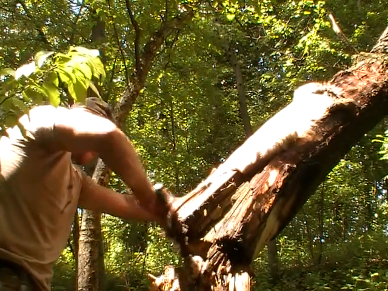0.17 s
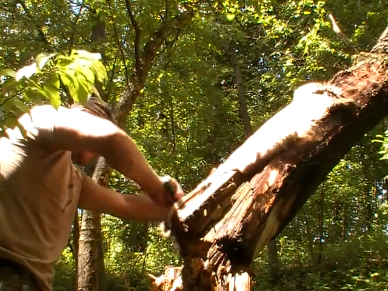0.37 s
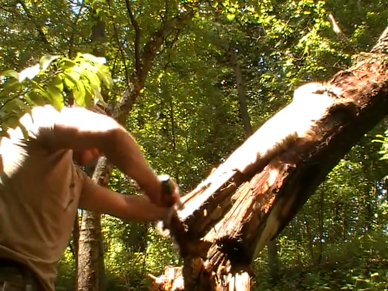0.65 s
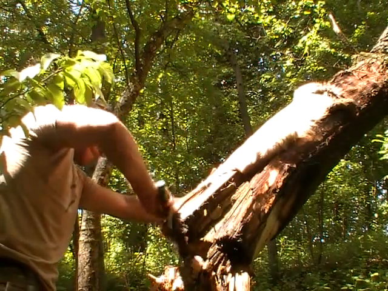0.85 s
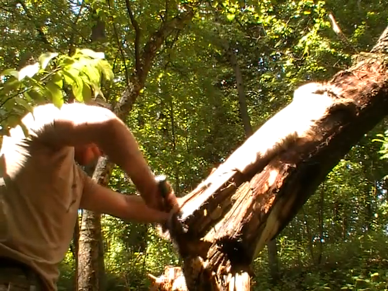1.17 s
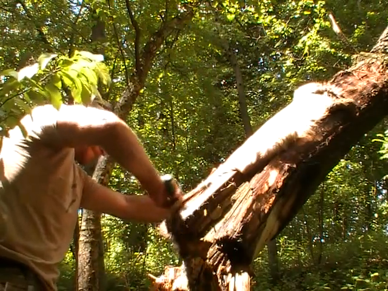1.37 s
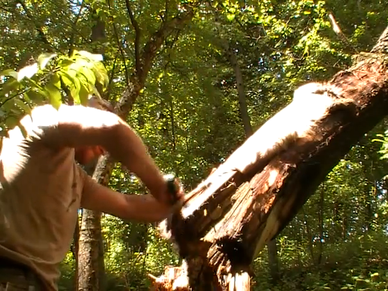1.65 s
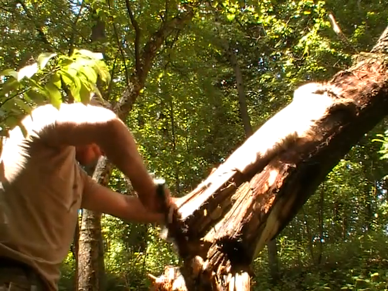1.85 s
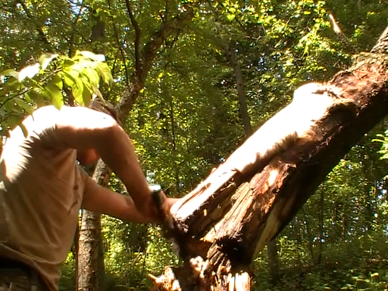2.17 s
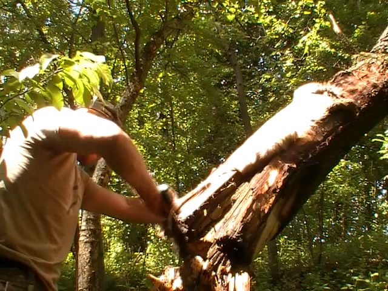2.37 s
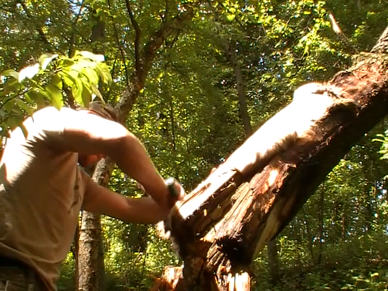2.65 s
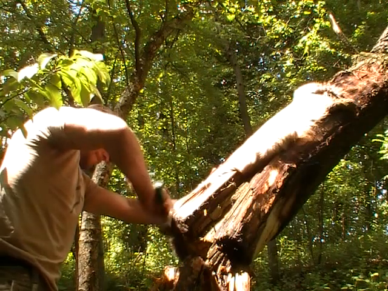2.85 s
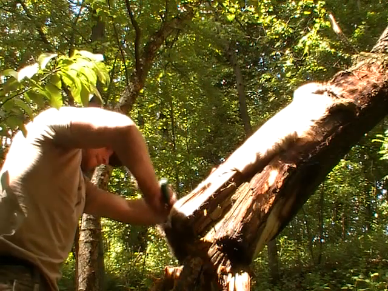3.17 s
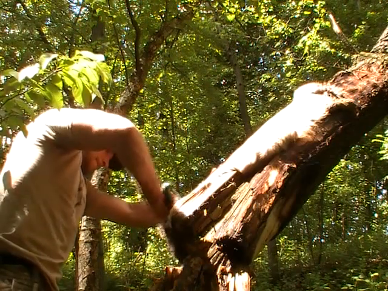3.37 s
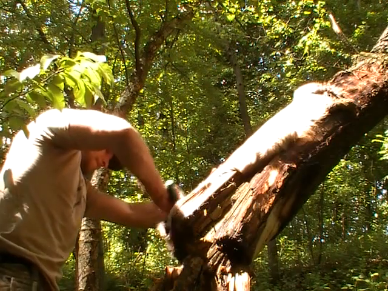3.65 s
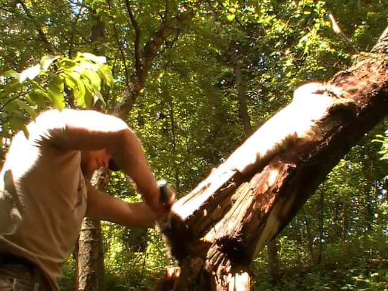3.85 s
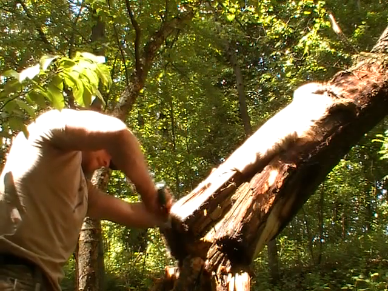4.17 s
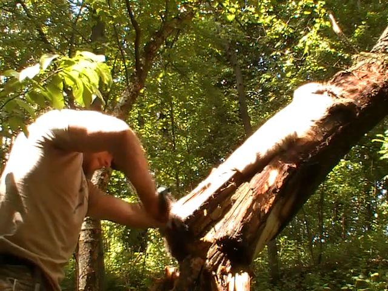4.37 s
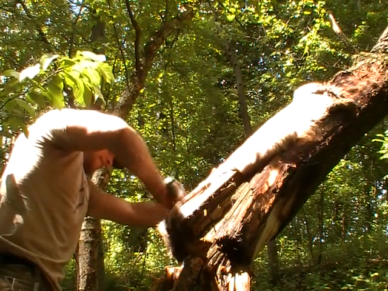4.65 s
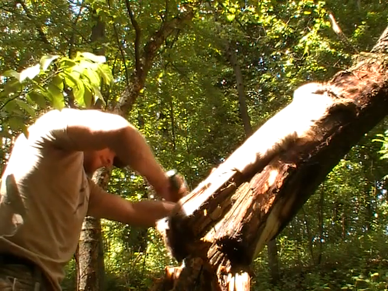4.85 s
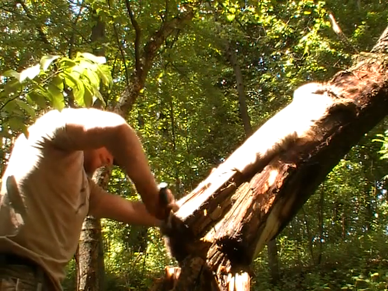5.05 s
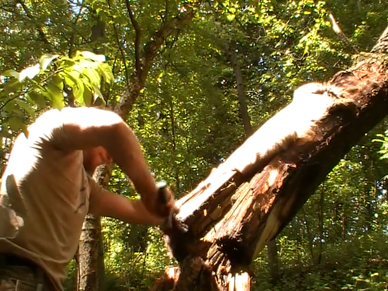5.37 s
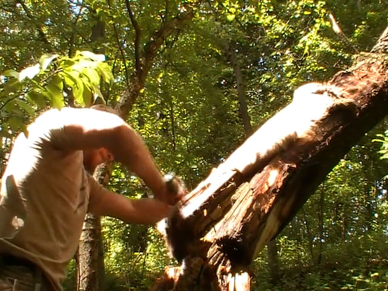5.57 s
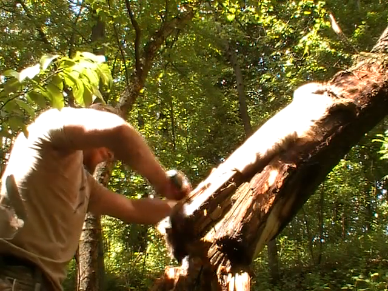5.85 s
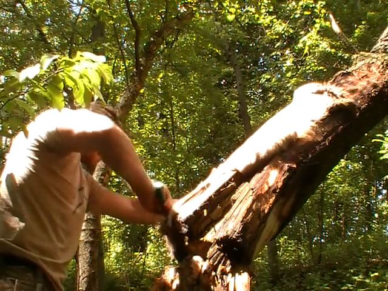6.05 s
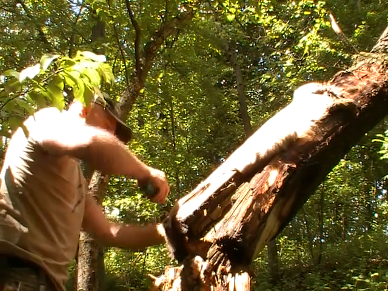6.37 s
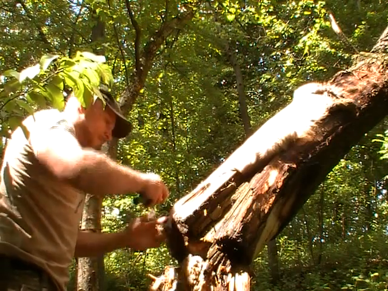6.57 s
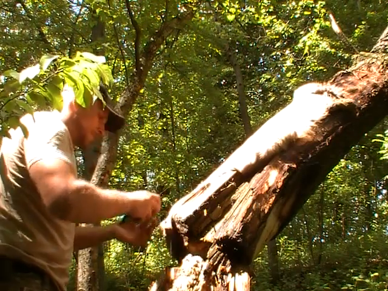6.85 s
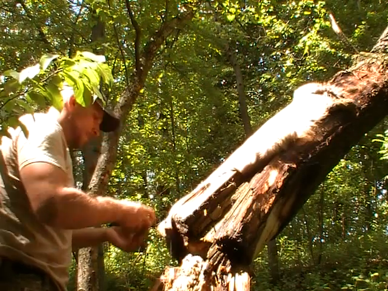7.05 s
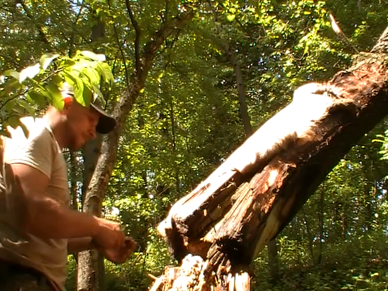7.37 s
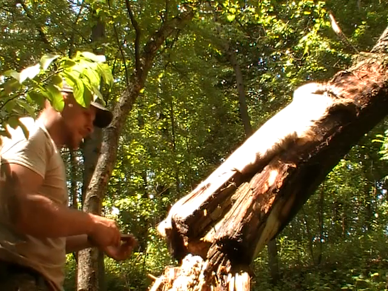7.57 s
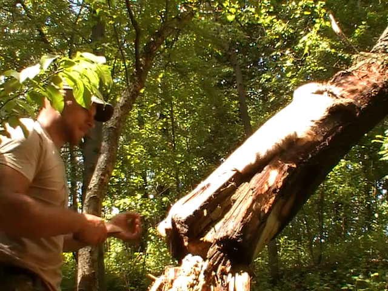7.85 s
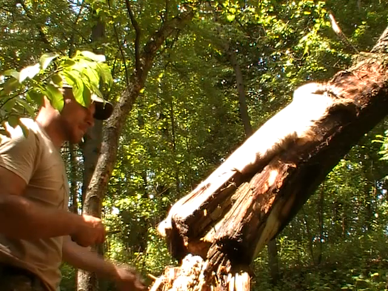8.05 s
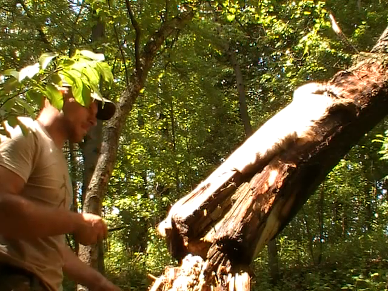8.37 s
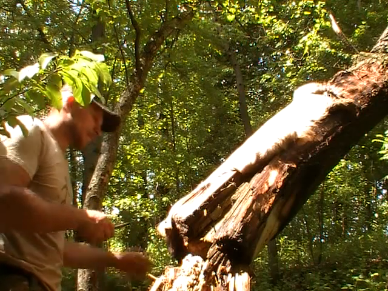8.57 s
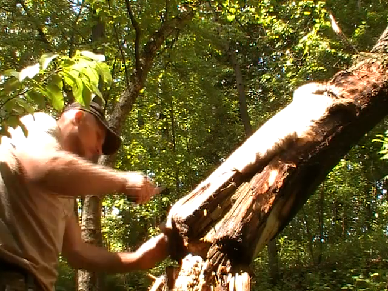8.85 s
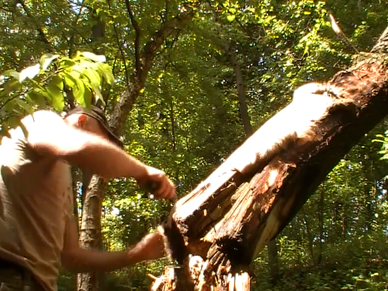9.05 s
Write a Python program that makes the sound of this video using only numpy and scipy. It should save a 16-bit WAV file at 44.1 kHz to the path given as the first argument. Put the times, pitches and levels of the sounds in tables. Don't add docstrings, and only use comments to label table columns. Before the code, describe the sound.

An outdoor wood with a quiet, steady hiss of leaves and distant traffic. From 0 to about 5.9 seconds a knife scrapes wet hide on a log some metres away: nineteen short strokes, roughly one every 0.3 seconds, each with a bright edge hiss, damp rasp and hollow wooden boom, slightly uneven in strength. A young bird gives thin, nasal, hoarse peeps throughout, mostly in pairs, weaker and more scattered from 3.5 to 6 seconds. Its mother yelps sharply with woodland echo near 0.9, 2.8 and 4.3 seconds, faintly at 5.5, with soft low hoots between and later. At 3.5 seconds a fly buzzes abruptly close and bumps the microphone with a hard double tick, gone by 3.6. After 6.1 seconds fingers rub sticky scraps, crackling softly, strongest around 7.2 to 7.4 with a crisp snap, then small snaps until the end at about 9.2.

```python
import sys
import numpy as np
from scipy import signal
from scipy.fft import rfft, irfft, next_fast_len
from scipy.io import wavfile
from scipy.ndimage import uniform_filter1d

SR = 44100
rng = np.random.default_rng(int(sys.argv[2]) if len(sys.argv) > 2 else 0)


def file_out(sig):
    cols = np.atleast_2d(sig).T
    lim = np.clip(cols, -1, 1)
    pcm = np.round(lim * 32767).astype(np.int16)
    wavfile.write(sys.argv[1], SR, pcm)


def gain_from_db(level_db):
    decades = np.asarray(level_db, float) / 20
    return 10 ** decades


N = 405719
TIME = np.arange(N) / SR
TREMBLE = uniform_filter1d(rng.standard_normal(N), 60) * np.sqrt(60)

# (edge bites [s], bite to hiss peak [s], edge hiss [dB], wet rasp [dB], log boom [dB])
KNIFE_STROKES = [(.092, .054, -51, -52.5, -50), (.405, .018, -51, -54.5, -53),
                 (.722, 0.054, -52.5, -54.5, -51), (1.018, .005, -52, -55.5, -50),
                 (1.335, .01, -52, -62, -52), (1.636, 0.058, -46.5, -61, -51),
                 (1.985, 0.059, -51, -55.5, -56.5), (2.342, .048, -52.5, -62, -56.5),
                 (2.662, .04, -46.5, -53, -50), (2.974, .005, -53, -56, -50.5),
                 (3.315, .02, -47, -56, -46.5), (3.632, .015, -47.5, -54.5, -48),
                 (3.958, 0.059, -46, -53.5, -47.5), (4.28, .064, -45.5, -53, -45.5),
                 (4.592, .06, -54, -56, -46.5), (4.908, .066, -51, -51.5, -47.5),
                 (5.208, 0.073, -51, -53.5, -51), (5.515, .006, -50.5, -54.5, -49.5),
                 (5.82, .085, -52, -51, -46)]
SLIDE_S = 0.09


def unit(x):
    return x / np.sqrt(np.mean(x ** 2))


def shaped(x, gain):
    size = next_fast_len(N)
    hz = np.arange(size // 2 + 1) * SR / size + 1
    return irfft(rfft(x, size) * gain(hz), size)[:N]


def ring(x, modes):
    def response(f):
        return sum(gain_from_db(db) / (1 + 1j * (f / hz - hz / f) * hz / width) for hz, width, db in modes)
    return unit(shaped(x, response))


def walk(rate_hz):
    hold = int(SR / rate_hz)
    steps = np.repeat(rng.standard_normal(N // hold + 1), hold)
    return unit(uniform_filter1d(uniform_filter1d(steps, hold), hold)[:N])


def grit(spread_db, flutter_db):
    size_db = spread_db * np.minimum(rng.exponential(size=N), 6)
    slips = rng.standard_normal(N) * gain_from_db(size_db)
    return slips * gain_from_db(flutter_db * walk(160))


def add(out, start, wave):
    wave = wave[max(-start, 0):N - start]
    start = max(start, 0)
    out[start:start + len(wave)] += wave


def wood(x, tail_db, echo_db):
    # (delay [s], level [dB])
    trunk_echoes = [(.006, -4), (.013, -5), (.022, -6), (.031, -8), (.052, -9), (.078, -12)]
    t60_s, onset_s = 0.43, 0.0052
    t = TIME[:int(SR * .7)]
    tail = rng.standard_normal(len(t)) * np.exp(-np.log(1000) * t / t60_s) * np.minimum(t / onset_s, 1)
    answer = tail * gain_from_db(tail_db) / np.sqrt(np.sum(tail ** 2))
    for delay_s, db in trunk_echoes:
        answer[int(delay_s * SR)] += gain_from_db(db + echo_db)
    return x + signal.fftconvolve(x, answer)[:N]


def stroke_level(peak_s, peak_db, bite_db, end_db):
    dig_s, lift_s = 0.041, 0.02
    touch_db, lifted_db = -21, -25
    bite = np.transpose(KNIFE_STROKES)[0][:, None]
    zero = 0 * peak_s
    end = zero + SLIDE_S
    s = bite + np.c_[zero - dig_s - .01, zero - dig_s, zero, peak_s, end, end + lift_s, end + lift_s + .01]
    shape_db = np.array([-50, touch_db + bite_db, bite_db, 0, end_db, lifted_db, -50])
    db = peak_db[:, None] + shape_db
    return gain_from_db(np.interp(TIME, s.ravel(), db.ravel()))


def knife():
    # (centre [Hz], width [Hz], level [dB])
    log_modes = [(1027, 270, 2), (1616, 540, -3), (2104, 380, -10)]
    edge_modes = [(6960, 2200, 2.5), (8500, 8200, 23.5), (12500, 4000, -13.5)]
    log_lead_s = 0.01
    _, peak_s, edge_db, rasp_db, log_db = np.transpose(KNIFE_STROKES)
    peak_s = np.clip(peak_s, .001, SLIDE_S - .005)
    halfway_s = np.full(len(KNIFE_STROKES), SLIDE_S / 2)

    def sagging(db, halfway_db, end_db):
        return stroke_level(halfway_s, db + halfway_db, -halfway_db, end_db - halfway_db)

    slips = grit(1.8, 2.25)
    hiss = ring(slips, edge_modes) * stroke_level(peak_s, edge_db, -4, -13)
    rasp = ring(slips + grit(1.7, 2.4), [(3200, 4400, 0)]) * sagging(rasp_db, -3, -12.5)
    boom = ring(ring(grit(2.6, 2.4), log_modes), [(1250, 1600, 0)])
    boom = boom * np.roll(sagging(log_db, -4.5, -13), -int(log_lead_s * SR))
    sound = hiss + gain_from_db(3.5) * rasp + gain_from_db(0.4) * boom
    return wood(sound * gain_from_db(1.16), -20.0, -23)


def hands():
    # (start [s], hold [s], level [dB])
    rubs = [
        (6.13, .15, -62),
        (6.38, 0.15, -54),
        (7.244, .12, -48),
        (7.85, .3, -64),
        (8.37, .17, -60.5),
        (8.6, .19, -56.5),
        (9.03, .01, -54),
        (9.19, .02, -54),
    ]
    # (time [s], peak [dB], mid share [dB], decay [s])
    snaps = [(.147, -36, -8, .002), (1.006, -35, -10, .001), (1.0145, -37, -9, .0007),
             (1.442, -36, -19, .0015), (1.695, -33, -18, .001), (1.7796, -37, -16, .001),
             (2.0424, -41, 2, .0015), (2.7144, -39, -6, .001), (2.9735, -39, -7, .001),
             (6.4377, -41, -15, .001), (6.54, -36, -20, .001), (6.6367, -40, -14, .001),
             (7.211, -38, -16, .0015), (7.2589, -36, -17, .0006), (7.3104, -34, -17, .0006),
             (7.3366, -21, -18, .0005), (7.3454, -35, -22, .001), (7.3564, -35, -20, .0007),
             (7.9422, -29, -17, .0025), (8.173, -31, -17, .0025), (8.374, -41, -14, .001),
             (8.717, -41, -20, .001), (8.752, -42, -20, .001), (8.945, -41, -20, .001),
             (8.4591, -43, -14, .001), (8.5893, -37, -10, .0007), (8.6945, -39, -14, .001),
             (8.7689, -43, -10, .001), (9.1645, -37, -2, .002)]
    rise_db_per_s, fall_db_per_s = 200, 200
    fiddle_db, fiddle_from_s = -71, 6.8

    levels_db = []
    for start_s, hold_s, db in rubs:
        before_s = np.maximum(start_s - TIME, 0)
        after_s = np.maximum(TIME - start_s - hold_s, 0)
        levels_db.append(db - rise_db_per_s * before_s - fall_db_per_s * after_s)
    floor_db = np.where(TIME > fiddle_from_s, fiddle_db, -120)
    rub_db = np.maximum(np.max(levels_db, axis=0), floor_db)
    out = ring(grit(3.2, 4.0), [(11600, 5700, 0), (6950, 2700, -12)]) * gain_from_db(rub_db + 2.0)

    t = TIME[:500]
    high = signal.butter(2, 8000, "high", fs=SR, output="sos")
    mid = signal.butter(2, [2200, 6000], "band", fs=SR, output="sos")
    for at_s, db, mid_db, decay_s in snaps:
        burst = rng.standard_normal(len(t)) * np.exp(-t / decay_s)
        top, body = signal.sosfilt(high, burst), signal.sosfilt(mid, burst)
        snap = top / abs(top).max() + gain_from_db(mid_db) * body / abs(body).max()
        add(out, int(at_s * SR), gain_from_db(db + 2.5) * snap)
    return out


def call(start_s, length_s, hz, db, arch, partials, hoarse):
    start = int(start_s * SR)
    share = np.arange(int(length_s * SR)) / (length_s * SR)
    tremble = 1 + hoarse * TREMBLE[start:][:len(share)]
    share = share[:len(tremble)]
    at, pitch, swell_db = np.transpose(arch)
    phase = 2 * np.pi * np.cumsum(hz * np.interp(share, at, pitch) * tremble) / SR
    wave = sum(gain_from_db(d + gain_db * (share - .5)) * np.sin(k * phase) for k, d, gain_db in partials)
    return start, np.sqrt(2) * wave * gain_from_db(db + np.interp(share, at, swell_db))


def chick():
    # (start [s], gap to second [s], top pitch [Hz], top pitch of second [Hz], level [dB])
    pairs = [(0.0, 0.093, 2547, 2510, -52), (.276, 0.11, 2530, 2490, -53), (.572, 0.12, 2530, 2470, -54.5),
             (.872, 0.13, 2520, 2499, -52), (1.351, 0.12, 2611, 2590, -50.5),
             (1.643, .122, 2570, 2520, -52), (2.146, 0.11, 2680, 2595, -51), (2.61, .12, 2490, 2500, -55),
             (2.903, 0.13, 2490, 2363, -53), (3.207, 0.1, 2527, 2478, -53.5),
             (6.051, 0.13, 2498, 2320, -54), (6.362, .128, 2330, 2376, -55.5),
             (6.659, 0.12, 2326, 2296, -58), (7.118, .103, 2450, 2420, -53.5),
             (7.405, .108, 2487, 2416, -53.5), (7.694, .098, 2510, 2450, -51),
             (7.98, 0.11, 2506, 2410, -52.5), (8.278, 0.1, 2457, 2380, -52), (8.568, 0.1, 2450, 2400, -53),
             (8.847, 0.11, 2496, 2450, -51)]
    # (start [s], top pitch [Hz], level [dB])
    singles = [(1.182, 2612, -52.5), (1.953, 2610, -51.5), (2.43, 2580, -52.5), (3.497, 2550, -54),
               (3.661, 2480, -58), (3.833, 2520, -56.5), (4.146, 2430, -59.5), (4.45, 2373, -59.5),
               (4.54, 2465, -59), (4.702, 2500, -57), (4.864, 2300, -57), (5.01, 2200, -61.5),
               (5.129, 2310, -57), (5.309, 2386, -58), (5.476, 2240, -62), (5.788, 2180, -62),
               (5.887, 2336, -56), (6.815, 2530, -62), (6.946, 2340, -60), (9.14, 2520, -53)]
    # (share of call [0-1], pitch share [0-1], level [dB])
    arch = [(0, .89, -15), (.2, .97, -4), (.37, 1.0, 0), (.55, .99, -1), (.7, .955, -5), (.85, .86, -9),
            (.95, .78, -13), (1, .75, -30)]
    # (multiple [1], level over third [dB], gain along the call [dB])
    partials = [(1, -13, -3), (4, -8, 0), (5, -13, -1)]
    # (time [s], second partial over third [dB])
    turn = [(0, -4.5), (1.5, -5.5), (3.2, -3), (4.5, 1.5), (6.9, -0.5), (9.2, -2)]
    peep_s = 0.052
    after_db, after_thin_db = -2, -1.5
    dip_hz, dip_width_hz, dip = 6200, 600, .75

    peeps = [(s, hz, db, 0) for s, _, hz, _, db in pairs]
    peeps += [(s, hz, db, 0) for s, hz, db in singles]
    peeps += [(s + gap_s, hz, db + after_db, after_thin_db) for s, gap_s, _, hz, db in pairs]
    out = np.zeros(N)
    for s, hz, db, thin_db in peeps:
        second_db = np.interp(s, *np.transpose(turn)) + thin_db
        voice = [*partials, (2, second_db + 1.2, 3), (3, 0, -3)]
        add(out, *call(s, peep_s, hz, db + 1.5, arch, voice, .011))
    out = shaped(out, lambda f: 1 - dip * np.exp(-((f - dip_hz) / dip_width_hz) ** 2))
    return wood(out * gain_from_db(2.5 * walk(500)), -13, -7.5)


def mother():
    # (start [s], length [s], top pitch [Hz], level [dB])
    yelp_calls = [
        (0.914, 0.048, 2508, -43),
        (2.788, 0.043, 2285, -42.5),
        (4.257, .042, 2373, -44.5),
        (5.514, 0.043, 2286, -53),
    ]
    # (start [s], length [s], pitch [Hz], level [dB])
    hoot_calls = [(1.72, 0.097, 802, -61.5), (4.14, 0.05, 810, -58), (5.46, 0.065, 810, -56.5),
                  (6.03, 0.055, 812, -55), (6.075, 0.043, 878, -58), (6.238, 0.1, 695, -61),
                  (6.72, 0.046, 961, -57.5), (6.74, .07, 1157, -61), (6.823, 0.083, 2500, -53),
                  (8.27, .05, 1155, -59), (8.83, .14, 2060, -62), (8.84, .15, 799, -55),
                  (8.96, 0.079, 1173, -61), (9.045, .05, 688, -54.5), (9.111, 0.044, 685, -54)]
    # (share of call [0-1], pitch share [0-1], level [dB])
    yelp_arch = [(0, .41, -18), (.08, .43, -8), (.2, .48, -4), (.3, .88, 0), (.4, .98, 0), (.68, .98, -1),
                 (.85, .8, -2), (1, .45, -9)]
    # (multiple [1], level [dB], gain along the call [dB])
    yelp_partials = [(1, -4.5, 1), (2, 0, 0), (3, -8.5, 0), (4, -22, 0)]
    hoot_arch = [(0, .95, -12), (.25, 1.0, 0), (.8, 1.0, -2), (1, .98, -14)]
    hoot_partials = [(1, 0, 0), (2, -11, 0)]
    throat_hz, throat_width_hz, rasp_db = 2400, 700, -10

    yelps, hoots = np.zeros(N), np.zeros(N)
    for row in yelp_calls:
        add(yelps, *call(*row, yelp_arch, yelp_partials, .025))
    for row in hoot_calls:
        add(hoots, *call(*row, hoot_arch, hoot_partials, .045))

    def throat(f):
        resonance = .8 + .45 / (1 + ((f - throat_hz) / throat_width_hz) ** 2)
        return resonance / (1 + (600 / f) ** 4)

    yelps = yelps * (1 + gain_from_db(rasp_db) * walk(1500))
    yelps = shaped(yelps, throat) * gain_from_db(1.3 * walk(500))
    hoots = hoots * gain_from_db(3.0 * walk(60))
    return wood(yelps, -.5, -5) + wood(hoots, -12, -12)


def fly():
    # (time [s], wing beat [Hz], level [dB])
    flight = [
        (3.36, 194, -61),
        (3.4, 191, -59),
        (3.49, 189.4, -62.5),
        (3.52, 189.5, -45),
        (3.54, 183.4, -35.5),
        (3.549, 189.4, -24),
        (3.565, 187.9, -27),
        (3.577, 195, -28.5),
        (3.6, 207, -57),
    ]
    # (multiple [1], level [dB])
    orders = [(1, -13), (2, 0), (3, 0), (4, -8), (5, -5), (6, -8), (7, -14), (8, -12), (9, -13), (10, -19),
              (11, -22), (12, -25), (13, -28)]
    # (time [s], ring [Hz], peak [dB])
    bumps = [
        (3.5697, 5100, -12),
        (3.5747, 11000, -9),
        (3.5493, 11000, -30),
        (3.5875, 9000, -30),
        (4.1, 9500, -41),
    ]
    s, hz, db = np.transpose(flight)
    phase = 2 * np.pi * np.cumsum(np.interp(TIME, s, hz) * (1 + 0.022 * walk(150))) / SR
    phase -= phase[int(bumps[0][0] * SR)]

    beats = np.zeros(N)
    for k, order_db in orders:
        level = gain_from_db(order_db + 1.5 * walk(120))
        offset = 2.2 + .12 * k * (k - 6) + .08 * k * walk(150)
        beats += level * np.cos(k * phase + offset)
    puff = ring(rng.standard_normal(N), [(160, 120, -7), (990, 740, -1.5)]) * np.exp(0.87 * np.cos(phase))
    tips = ring(grit(2.3, 2.7), [(9600, 3700, 0)]) * np.exp(2.5 * np.cos(2 * phase))
    buzz = unit(beats) + gain_from_db(-12.0) * unit(puff) + gain_from_db(-10.5) * unit(tips)
    out = buzz * gain_from_db(np.interp(TIME, s, db, left=-140, right=-140))

    t = TIME[:90]
    body = .2 * np.exp(-t / 0.00023) * np.cos(2 * np.pi * 1900 * t)
    for at_s, ring_hz, peak_db in bumps:
        tick = np.exp(-t / 0.00015) * np.cos(2 * np.pi * ring_hz * t) + body
        add(out, int(at_s * SR), gain_from_db(peak_db) * tick)
    return out


def leaves():
    # (frequency [Hz], level per Hz [dB])
    spectrum = [(26, -61), (45, -17), (53, -25), (114, -24), (398, -5), (960, 1), (2750, -7), (4270, -6),
                (4710, -7), (5590, -8), (7150, -7.5), (8080, -9), (9590, -9), (11900, -10.5), (15600, -25)]
    level_db = -53
    hz, db = np.transpose(spectrum)
    noise, swell, out = rng.standard_normal(N), walk(0.64), np.zeros(N)
    for mid_hz in 30 * 2. ** np.arange(10):
        band = shaped(noise, lambda f: np.cos(np.pi / 2 * np.clip(np.log2(f / mid_hz), -1, 1)) ** 2)
        out += band * gain_from_db(0.063 * swell + 1.05 * walk(9.8))
    hiss = shaped(out, lambda f: gain_from_db(np.interp(np.log(f), np.log(hz), db)))
    return unit(hiss) * gain_from_db(level_db)


def scene():
    near = shaped(knife() + hands() + fly(), lambda f: 1 / (1 + (f / 14200) ** 8))
    mono = near + chick() + mother() + leaves()
    return np.array([mono, mono])


def roll_off(x):
    return signal.sosfilt(signal.butter(12, 15790, fs=SR, output="sos"), x)


def record(dry):
    duck_s, duck_level, bass_hz, top_hz = .04, 0.052, 70, 15800
    keep = np.exp(-1 / (duck_s * SR))
    loudness = signal.lfilter([1 - keep], [1, -keep], abs(dry[0]))
    ducked = dry / (1 + (loudness / duck_level) ** 2)
    top = signal.ellip(10, .2, 60, top_hz, fs=SR, output="sos")
    bass = signal.butter(1, bass_hz, "high", fs=SR, output="sos")
    mix = signal.sosfilt(np.vstack([top, bass]), ducked)
    return roll_off(mix)


dry = scene()
out = record(dry)
file_out(out)
```